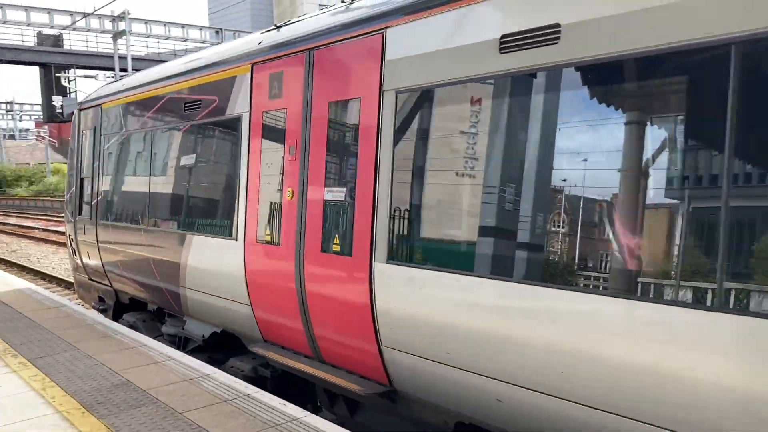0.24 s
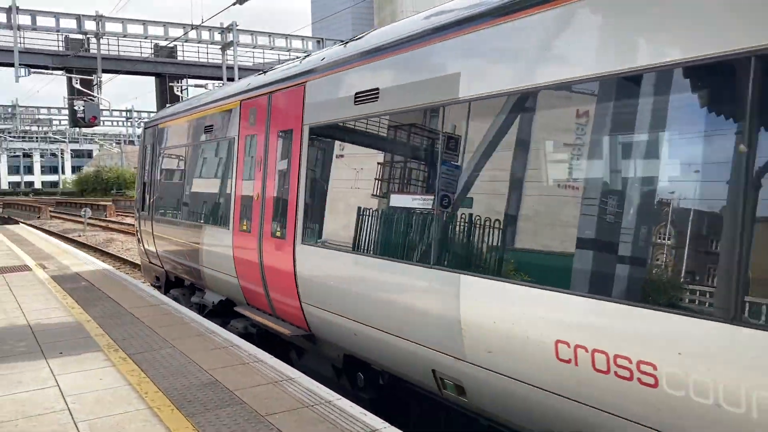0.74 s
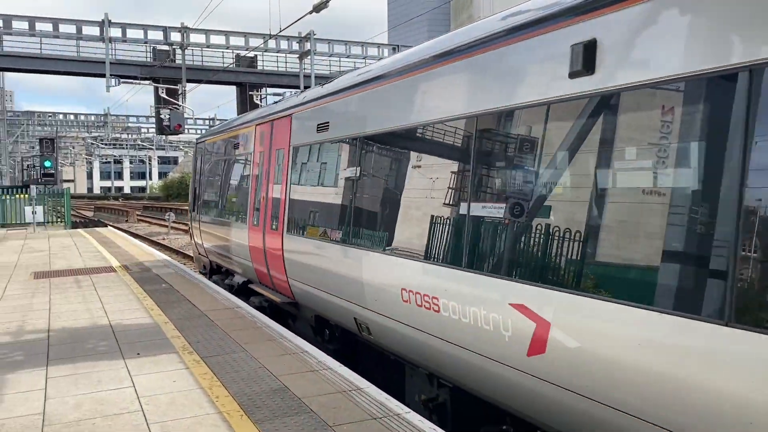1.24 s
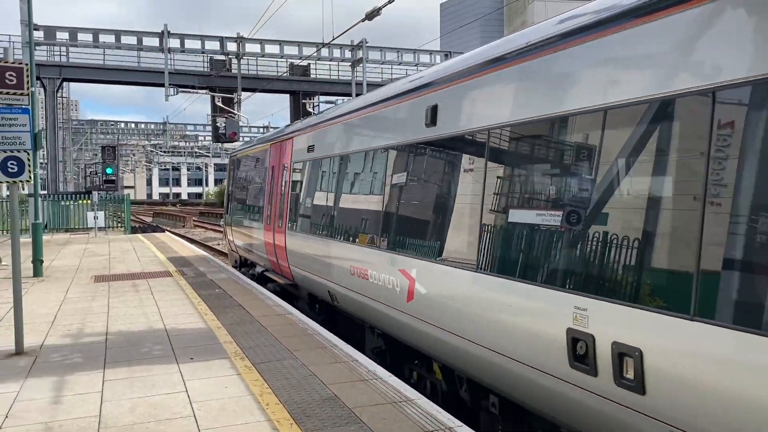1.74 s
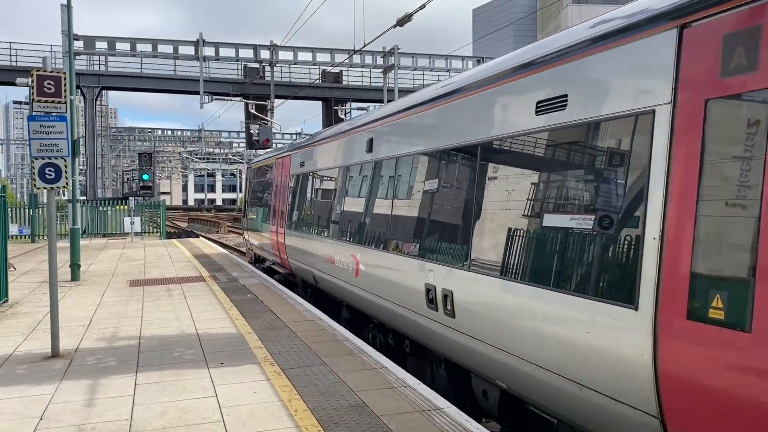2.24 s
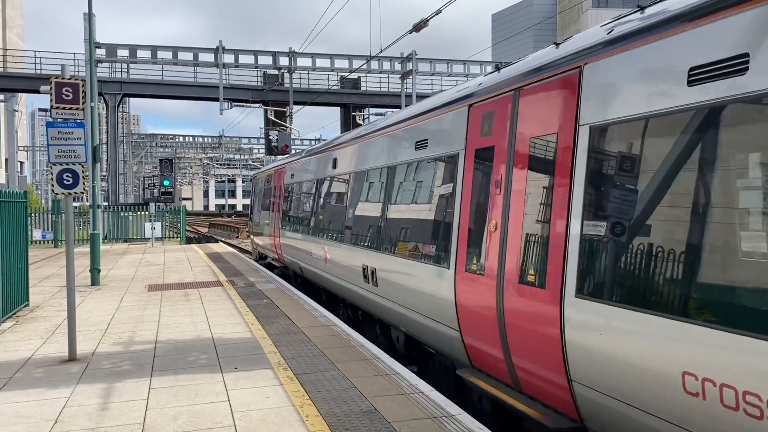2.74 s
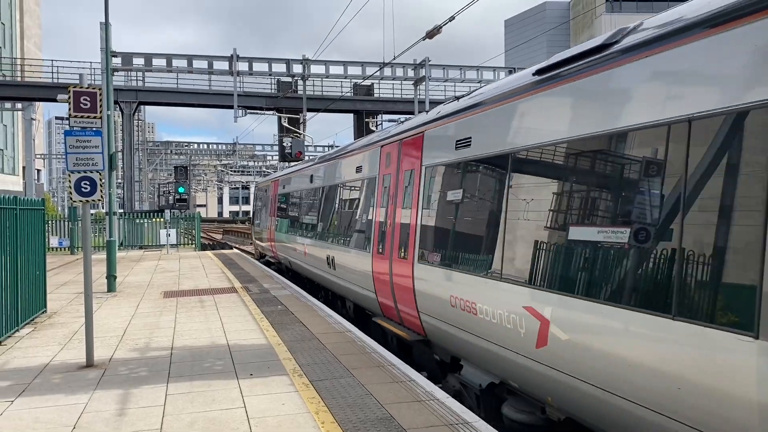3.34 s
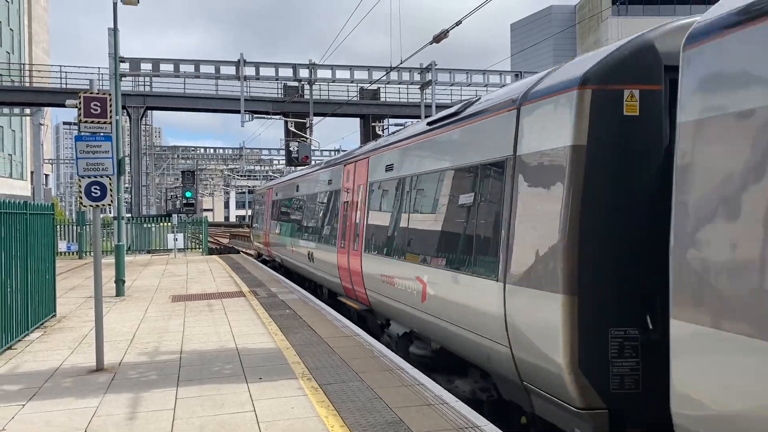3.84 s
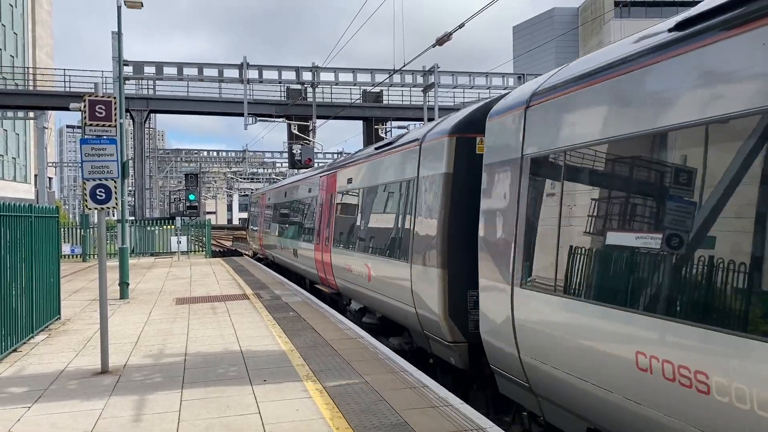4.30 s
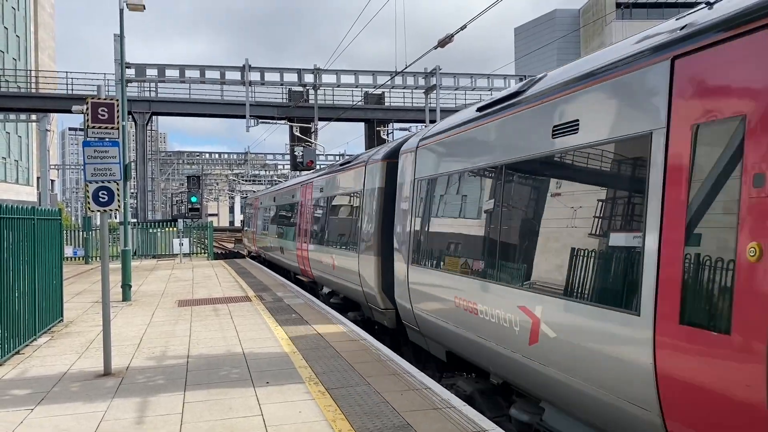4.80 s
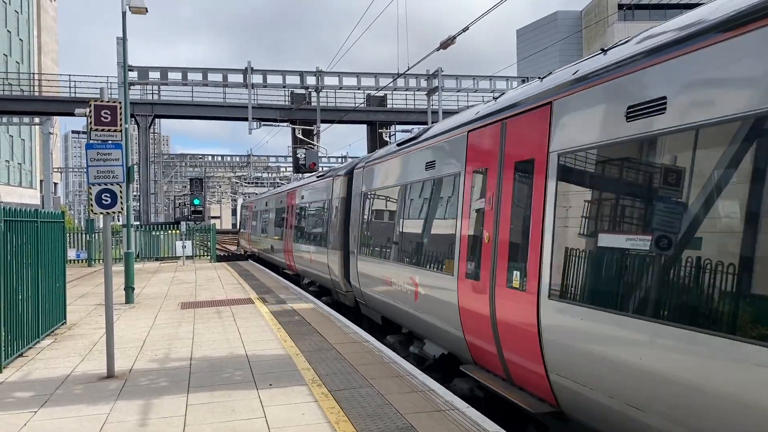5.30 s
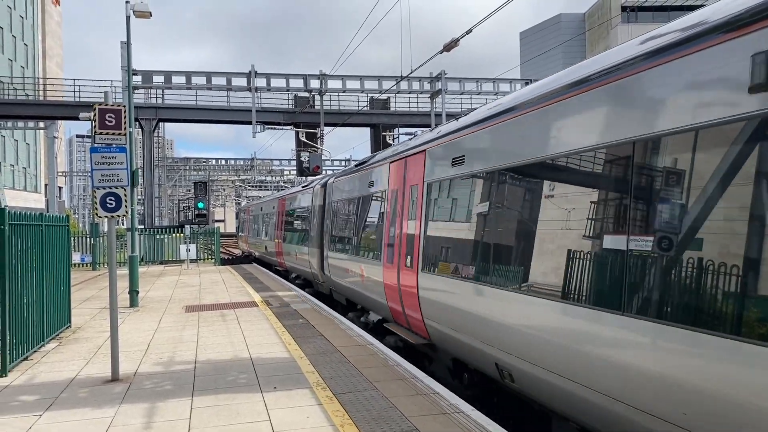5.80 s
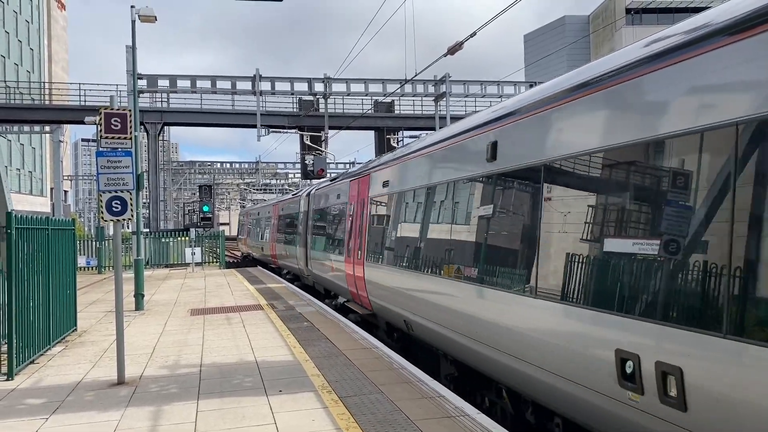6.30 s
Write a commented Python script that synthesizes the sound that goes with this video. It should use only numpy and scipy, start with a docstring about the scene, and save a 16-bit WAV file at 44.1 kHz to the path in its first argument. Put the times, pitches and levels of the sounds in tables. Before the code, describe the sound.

Outdoors on a station platform, a diesel railcar train gathers speed past a close, small stereo microphone. Two steady low exhaust drones waver and beat while rolling rumble builds. Soft low thumps mark rail joints, a faint thin whine flutters in the first half, one tiny creak comes past the middle, and the last seconds are loudest with engine clatter and fan hiss.

```python
"""Two low exhaust drones, waxing and beating, over a wide roar: a diesel railcar train pulls along a platform.
The drones are orders of a nearly steady crankshaft; the drive shaft's orders rise with road speed.
Gear and turbocharger whines are tones with random flutter, a creak is three harmonics of a slip rate,
and rail joints thump as short decaying sines. The roar is shaped noise that swells as each car's engine
block and fans come by. A small two-port microphone hears partly alike sound in each port."""
import sys
import numpy as np
from scipy import signal
from scipy.io import wavfile
from scipy.ndimage import uniform_filter1d

SR = 44100
rng = np.random.default_rng(int(sys.argv[2]) if len(sys.argv) > 2 else 0)


def persist_wave(psi):
    """Save psi, clipped to +-1, as 16-bit WAV."""
    counts = np.round(np.clip(psi, -1, 1) * 32767).astype(np.int16)
    wavfile.write(sys.argv[1], SR, np.atleast_2d(counts).T)


N = 288855

RATE = 500  # slow clock for levels and pitches, Hz
T = np.arange(N // 88 + 2) / RATE  # its times, s


def gain_of(db):
    """Amplitude ratio: a gain of ten for every 20 dB."""
    return 10 ** (np.asarray(db) / 20)


def evened(x):
    """Normalisation: scales the mean square to 1."""
    return x / np.sqrt(np.mean(abs(x) ** 2) + 1e-20)


def columns(rows, t=T):
    """Linear interpolation: each column after the first, read at the times t."""
    seconds, *rest = np.transpose(rows)
    return [np.interp(t, seconds, column) for column in rest]


def window(rows, fade):
    """Gating: one while the table lasts, with linear fades of the given seconds."""
    since_start = T - rows[0][0]
    until_end = rows[-1][0] + fade - T
    return np.clip(np.minimum(since_start, until_end) / fade, 0, 1)


def swell(t, at, lasts):
    """Gaussian passage: one at its height, 1/e at `lasts` seconds to either side."""
    return np.exp(-((t - at) / lasts) ** 2)


def drift(rate_hz):
    """Low-passed complex Gaussian noise of rms 1: halved in amplitude at half of rate_hz."""
    a, b = rng.standard_normal((2, len(T)))
    hz = np.fft.fftfreq(len(T), 1 / RATE)
    lowpass = 1 / (1 + (2 * hz / rate_hz) ** 2)
    return evened(np.fft.ifft(np.fft.fft(a + 1j * b) * lowpass))


def tone(left, right, hz):
    """Phasor modulation: phase integrates frequency, and each port has its own complex rms level."""
    t = np.arange(N) / SR
    turns = np.interp(t, T, np.cumsum(hz) / RATE) + rng.random()
    carrier = np.exp(2j * np.pi * turns)
    levels = [np.interp(t, T, side + 0j) for side in (left, right)]
    return np.sqrt(2) * (carrier * levels).real


def ports(hz):
    """Spatial coherence: likeness of the two ports, and the phase factor of the right one."""
    # Each row: frequency in Hz, likeness from 0 to 1 before its ripple, right port's lead in radians.
    # Above 9 kHz the right port's lead rises in a straight line with frequency.
    port_rows = [(40, .8, 0), (90, .68, .05), (200, .9, .62), (300, .8, .7), (430, .43, 1.6),
                 (600, .4, 2.05), (900, .5, 1.7), (1250, .38, 2.1), (1650, .15, 4), (2300, .42, 5.9),
                 (3300, .48, 5.75), (4000, .72, 6.25), (4700, .5, 6), (5500, .05, 6), (6200, .5, 6.3),
                 (7000, .63, 6.2), (9000, .99, 9.42), (16000, .99, 19.85)]
    f, same, lead = np.transpose(port_rows)
    lead = np.interp(hz, f, lead)
    # above 9 kHz the likeness ripples with the lead, lowest midway between multiples of pi
    likeness_ripple = .25 * (hz > 9000) * np.sin(lead) ** 2
    same = np.interp(hz, f, same) - likeness_ripple
    return np.clip(same, 0, 1), np.exp(1j * lead)


def spread(level, hz, rough, rate_hz):
    """Partial coherence: a randomly fading tone, alike at the ports as far as they agree at its pitch."""
    same, lead = ports(hz)
    shared, own = drift(rate_hz), drift(rate_hz)
    steady = np.sqrt(1 - np.clip(rough, 0, 1) ** 2)
    left = steady + rough * shared
    right = lead * (steady + rough * (same * shared + np.sqrt(1 - same ** 2) * own))
    return tone(level * left, level * right, hz)


def colour(shape, hz):
    """Power spectral density: a (Hz, dB per Hz) table as power per bin, summing to 1."""
    f, db = np.transpose(shape)
    db_at_bins = np.interp(np.log(hz + 1), np.log(f), db, left=-90, right=-90)
    power = gain_of(2 * db_at_bins)
    return power / power.sum()


def rolling_power(t, hz):
    """Rolling noise: wheels and bodywork radiate three fixed spectra whose levels follow the train."""
    # Spectra of deep rumble, rolling rumble and body. Each row: frequency in Hz, relative level in dB per Hz.
    deep, rumble, body = [(20, -22), (30, -19), (42, -1.5), (58, 0.5), (72, 1), (90, -24)], [(50, -10), (70, -3), (90, 3.5), (125, -0.5), (195, -6), (260, -3)], [(150, -19), (195, -7.5), (280, -1), (360, -4.5),
                                                        (470, -4), (580, -9), (800, -11)]
    # Wheels and bodywork. Each row: time in seconds, deep rumble, rolling rumble and body levels in dB.
    roll = [(0, -38, -35, -35), (.6, -41, -33.5, -34.5), (1.3, -35, -29, -30.5), (1.75, -34.5, -28.5, -31),
            (2.1, -34, -28, -29.5), (2.8, -29, -27, -27.5), (3.25, -31, -27, -25.5), (3.9, -28, -30, -27.5),
            (4.6, -29, -24.5, -26), (5.3, -20, -26.5, -25), (5.55, -23, -18, -23), (5.85, -30, -25, -25),
            (6.2, -21, -19, -19.5), (6.55, -26, -20, -21)]
    layers = zip((deep, rumble, body), columns(roll, t))
    return sum(np.outer(colour(shape, hz), gain_of(2 * db)) for shape, db in layers)


def passing_power(t, hz):
    """Inverse-square spreading: engine clatter and fan hiss as each car passes, the hiss dulled by distance."""
    # Spectra of engine block and fans. Each row: frequency in Hz, relative level in dB per Hz.
    clatter, hiss = [(400, -48), (600, -3), (850, -1.5), (1100, -2.5), (1300, -6), (1800, -8.5),
                     (2300, -11), (3000, -18), (4500, -28.5)], [(1800, -8), (3000, -3), (4100, -1), (5500, -2.5), (7000, -2),
                                      (9000, -5.5), (11000, -7), (16000, -9.5)]
    # Engine block, then cooling fans. Each row: block nearest at seconds, clatter in dB, fans nearest at
    # seconds, hiss in dB before its tilt, hiss brightness in dB per octave before dulling, and the seconds
    # to draw off as far as the track is from the microphone.
    passes = [(2.2, -28.5, 1.87, -37, -1, 0.96), (6, -23.5, 6.71, -25.5, 6, 0.6)]
    dulling_db = 1.46  # lost per octave above 5 kHz, for each track distance
    octaves = np.log2(np.maximum(hz, 5000) / 5000)
    power = 0
    for block_s, clatter_db, fans_s, hiss_db, bright_db, lasts in passes:
        # distances, in units of the nearest
        block, fans = (np.hypot(1, (t - at) / lasts) for at in (block_s, fans_s))
        power += np.outer(colour(clatter, hz), gain_of(2 * clatter_db) / block ** 2)
        tilt = gain_of(2 * np.outer(octaves, bright_db - dulling_db * fans))
        power += np.outer(colour(hiss, hz), gain_of(2 * hiss_db) / fans ** 2) * tilt
    return power


def line_power(t, hz):
    """Narrow-band noise: fuzzy lines that swell as their gear, pump or panel comes by."""
    # Each row: frequency in Hz, full width at 1/e power in Hz, level in dB, loudest at seconds,
    # seconds to 1/e power.
    noise_lines = [(1530, 8.5, -45, 0.6, 0.43), (1130, 9, -37, 2.17, 0.65), (1040, 15, -38.5, 1.9, 0.47),
                   (3900, 48, -40, 2.07, 0.12), (3885, 60, -49.5, 2.1, 0.96), (216, 6, -34, 6, .6),
                   (9900, 700, -52, 2.4, 1.2), (12880, 700, -55, 2, .3), (1520, 14, -47, 1.4, 0.3),
                   (1504, 13, -41, 2.68, 0.3), (863, 23, -40, 3.1, 1.9), (1348, 11, -41.5, 3, 1.2),
                   (503, 12, -36, 4.26, 0.32), (653, 31, -39, 3.9, 0.88), (428, 12, -31.5, 5.8, 0.54),
                   (1682, 20, -38, 5.55, 0.26), (2390, 70, -39.5, 5.54, 0.19), (651, 18, -36, 5.2, 0.29),
                   (714, 20, -31, 6.07, 0.33), (874, 49, -28, 6.4, 0.28), (1080, 43, -44, 7.6, 0.28),
                   (3840, 47.5, -43, 6.2, 0.23), (4280, 200, -38, 6.35, 0.21), (337, 25, -32, 5, 0.077),
                   (316, 40, -24.5, 6.25, 0.15)]
    power = 0
    for f, width, db, at, lasts in noise_lines:
        line = np.exp(-(2 * (hz - f) / width) ** 2)
        power += np.outer(line / line.sum(), gain_of(2 * db) * swell(t, at, lasts))
    return power


def roar():
    """Short-time spectral synthesis: random bins take the summed power of five noise layers and the lines."""
    # Balance of the ports. Each row: frequency in Hz, dB by which the left is louder.
    left_excess = [(60, -1), (130, 3.5), (290, 2.5), (640, -1.5), (1410, -1.0), (3100, 1.5), (6820, -1),
                   (15000, 1)]
    frames, hz = N // 1024 + 5, np.fft.rfftfreq(4096, 1 / SR)
    t = np.arange(frames) * 1024 / SR
    power = rolling_power(t, hz) + passing_power(t, hz) + line_power(t, hz)

    a, b, c, d, patches = rng.standard_normal((frames, len(hz), 5)).T
    patches = uniform_filter1d(patches, size=12, axis=0)  # smooth over frequency
    patches = evened(uniform_filter1d(patches, size=6, axis=1))  # and over time
    same, lead = (v[:, None] for v in ports(hz))
    left, own = a + 1j * b, c + 1j * d
    z = np.array([left, lead * same * left + np.sqrt(1 - same ** 2) * own])
    excess_db = np.interp(hz, *np.transpose(left_excess))
    z *= gain_of(np.multiply.outer([.5, -.5], excess_db))[:, :, None]

    # rms of the same noise when its bin powers sum to 1
    unit = signal.istft(left / np.sqrt(len(hz)), nperseg=4096, noverlap=3072)[1].std()
    z *= np.sqrt(power) * gain_of(1.6 * patches) / unit
    return signal.istft(z, nperseg=4096, noverlap=3072)[1][:, :N]


def thumps():
    """Impact response: each wheel over a rail joint gives a low, damped sine a few cycles long."""
    # Each row: start in seconds, nominal envelope peak in dB, frequency in Hz.
    joints = [(0.309, -22, 72.7), (0.862, -18.5, 135), (1.074, -18, 118), (1.819, -35, 119),
              (2.947, -16, 120.7), (4.63, -17, 93), (5.55, -13, 110)]
    out, t = np.zeros(N + SR), np.arange(SR // 5) / SR
    envelope = np.e * t / 0.013 * np.exp(-t / 0.012)
    for s, db, hz in joints:
        at = round(s * SR)
        out[at:at + len(t)] += gain_of(db) * envelope * np.sin(2 * np.pi * hz * t)
    return out[:N]


def creak():
    """Stick-slip: slipping gangway rubber sounds three high harmonics of its slip rate."""
    # Each row: time in seconds, slips per second, level in dB.
    slips = [(4.575, 121, -42), (4.59, 122, -35), (4.62, 123.5, -33), (4.645, 125.5, -29.5),
             (4.67, 125, -37), (4.73, 124.5, -43)]
    # Each row: multiple of the slip rate, relative level in dB.
    harmonics = [(11, -12), (12, -8), (13, 0)]
    hz, level_db = columns(slips)
    level = gain_of(level_db) * window(slips, fade=0.012)
    out = np.zeros((2, N))
    for k, db in harmonics:
        z = level * gain_of(db) * (1 + 0.48 * drift(45.))
        out += tone(z, -1j * z, round(k) * hz)  # right port a quarter turn behind
    return out


def whines():
    """Random modulation: the first engine's gear whine flutters, the turbocharger whistle faster above it."""
    # Gear, then turbocharger. Each row: time in seconds, frequency in Hz, level in dB.
    gear, turbo = [(0, 1967, -45), (.5, 1940, -43), (1, 1942, -43), (1.3, 1940, -41), (1.8, 1926, -42),
                   (2.3, 1916, -38.5), (2.8, 1953, -36.5), (3.45, 1960, -36.5), (3.65, 1930, -48),
                   (4.2, 1944, -46), (4.6, 1970, -46)], [(0, 8400, -70), (.7, 8350, -53), (1.4, 8280, -53), (2.2, 8230, -47),
                                  (3, 8400, -48), (3.7, 8700, -63), (4.2, 8800, -72)]
    out = np.zeros((2, N))
    for rows, rate_hz in ((gear, 50.), (turbo, 200.)):
        hz, level_db = columns(rows)
        out += spread(gain_of(level_db) * window(rows, fade=0.072), hz, rough=1, rate_hz=rate_hz)
    return out


def shaft():
    """Rotational harmonics: a hum and its multiples rise with road speed, the higher ones rougher."""
    # Drive shaft as it comes near. Each row: time in seconds, level in dB.
    shaft_levels = [(3.7, -32), (4.4, -38), (4.9, -33), (5.25, -26), (5.6, -20), (5.85, -18.5), (6, -27.5),
                    (6.55, -29)]
    # Each row: multiple of the shaft speed, relative level in dB.
    multiples = [(1, -0.5), (2, -9), (3, -12), (5, -14)]
    level = gain_of(columns(shaft_levels)[0]) * window(shaft_levels, fade=.2)
    hz = 13.7 + 7.4 * T  # turns per second grow evenly as the train speeds up
    return sum(spread(level * gain_of(db), round(k) * hz, rough=.2 * k, rate_hz=4.) for k, db in multiples)


def beating(order):
    """Interference: complex level of an order as another engine, a little off in speed, beats with it."""
    # Each row: order, strongest at seconds, seconds to 1/e, beats per second, share of the level;
    # a positive share cancels at its strongest moment, a negative one reinforces.
    beats = [(6, .84, 0.25, 4.8, 0.6), (6, 0.31, 0.24, 4.4, -0.29), (6, 1.4, 0.38, 2.7, 0.36),
             (6, 4.68, 0.32, 4.2, 0.45), (6, 5.6, 0.26, 5.7, 0.4), (6, 6.27, 0.12, 4.7, 0.93),
             (6, 1.75, 0.088, 4, .7), (6, 3.2, 0.2, 3.5, 0.088), (9, 6.34, 0.11, 4.7, 0.34),
             (9, 5.5, .15, 3.1, 0.42), (9, .08, 0.081, 4, 0.74), (9, 2.54, 0.12, 4.97, 0.72),
             (9, 3.52, 0.61, 3.42, 0.48), (9, 4.07, 0.22, 4.7, 0.39), (9, 4.98, 0.27, 1.2, .92),
             (9, 8.6, 0.44, 2.8, 0.22)]
    z = np.ones(len(T), complex)
    for k, at, lasts, rate, share in beats:
        if round(k) == order:
            z = z * (1 - share * swell(T, at, lasts) * np.exp(2j * np.pi * rate * (T - at)))
    return z


def engine():
    """Engine orders: exhaust tones at multiples of crank speed, two strong and clean, others come and go."""
    # Each row: time in seconds, crankshaft turns per second.
    crank_speed = [(0, 26.5), (.6, 26.35), (1.5, 26.25), (2.2, 26.28), (2.7, 26.42), (3.6, 26.38),
                   (4.5, 26.45), (5.4, 26.52), (5.9, 26.65), (6.55, 26.75)]
    # Exhaust drone. Each row: time in seconds, 9th order level in dB, 6th order level in dB.
    drone = [(0, -37.5, -31), (.35, -29.5, -24.5), (.7, -28.5, -32), (1.1, -26, -24.5), (1.5, -18, -30),
             (1.8, -22, -28.5), (2.3, -23.5, -23), (2.6, -31.5, -16.5), (2.9, -17, -22), (3.2, -22, -14.5),
             (3.6, -22, -18.5), (3.75, -19.5, -22), (3.95, -26.5, -18), (4.3, -20, -25), (4.7, -21.5, -32),
             (5.2, -21.5, -22.5), (5.55, -22, -29.5), (5.95, -13, -18.5), (6.25, -12.5, -30),
             (6.55, -17, -18.5)]
    # Where they arrive from. Each row: time in seconds, then for the 9th and again for the 6th order
    # the right port's lead in radians and the left port's excess in dB.
    drone_side = [(0, 1, 2, 0.25, -1), (.7, .1, 4.5, 0.7, 4), (1.1, .6, -2.5, 0.2, 6),
                  (1.75, 1, -3.5, -.1, -3), (2.3, 0.61, 1, 0.05, -3), (2.75, 0.37, 2, 0.6, 6),
                  (3.15, 0.59, -.8, .5, -2), (3.55, 0.78, 2.5, 0.4, 2.2), (3.9, 0.048, -.8, 0.2, -.4),
                  (4.55, 0.35, -4, 0.73, -2.2), (5.25, .03, 5, .25, 1.5), (5.8, .9, -2.5, .15, 5),
                  (6.55, .96, 3, .33, 2.3)]
    # Weaker orders, each swelling as its engine comes by. Each row: multiple of crank speed, level in dB,
    # loudest at seconds, seconds to 1/e amplitude.
    weak_orders = [(15, -43.5, 0.39, 0.67), (18, -40, 0.33, 0.19), (11, -33.5, 1.44, 0.94),
                   (18, -35.5, 1.46, 0.53), (10, -38.5, 0.95, 0.44), (3, -37, 2.7, 0.73),
                   (5, -33, 3.5, 0.82), (8, -29.5, 3.53, 0.55), (11, -33.5, 3.22, 0.98),
                   (12, -32, 3.84, 0.7), (18, -29.5, 3.85, 0.49), (10, -35.5, 4.67, 0.59),
                   (4, -31, 4.54, 0.36), (15, -35, 4.47, 0.27), (4, -19, 5.1, 0.14),
                   (18, -29.5, 5.67, 0.47), (8, -31, 6.36, 0.69), (27, -39, 4.5, 0.34)]
    crank, = columns(crank_speed)
    out = np.zeros((2, N))
    side = columns(drone_side)
    for k, level_db, lead, pan_db in zip((9, 6), columns(drone), side[::2], side[1::2]):
        z = gain_of(level_db) * beating(order=k)
        left = z * gain_of(pan_db / 2)
        right = z * gain_of(-pan_db / 2) * np.exp(1j * lead)
        out += tone(left, right, k * crank)
    for k in sorted({round(row[0]) for row in weak_orders}):
        level = sum(gain_of(db) * swell(T, at, lasts) for m, db, at, lasts in weak_orders if round(m) == k)
        out += spread(level, k * crank, rough=.6, rate_hz=4.)
    return out


def scene():
    """Superposition: all sources add at the two ports."""
    return roar() + thumps() + creak() + whines() + shaft() + engine()


def record(dry):
    """Microphone response: deep bass rolls off, the highest peaks saturate, then the band is limited."""
    lean = signal.sosfilt(signal.butter(N=3, Wn=38., btype="high", fs=SR, output="sos"), dry)
    soft = 1.392 * np.tanh(lean / 1.413)
    band_limit = signal.firwin(1023, 15750, window=("kaiser", 10), fs=SR)  # low-pass, Hz
    return signal.oaconvolve(soft, band_limit[None], "same")


dry = scene()
out = record(dry)
persist_wave(out)
```